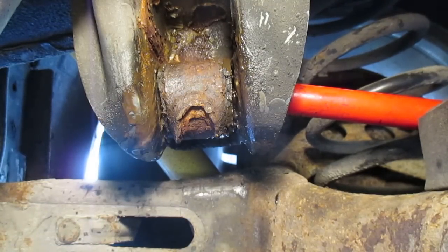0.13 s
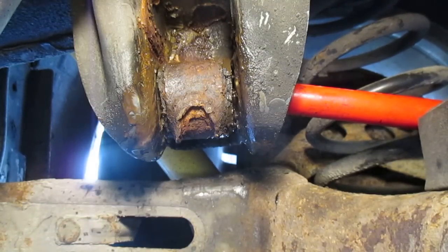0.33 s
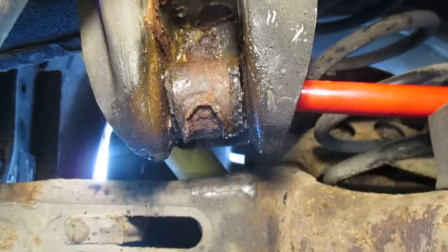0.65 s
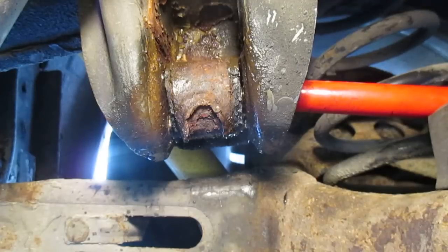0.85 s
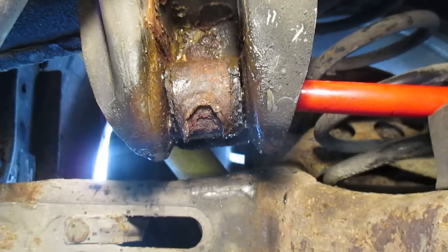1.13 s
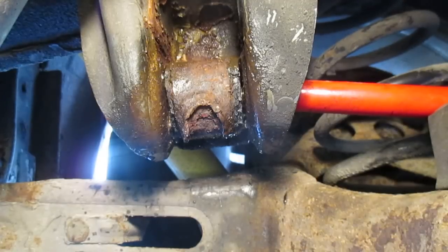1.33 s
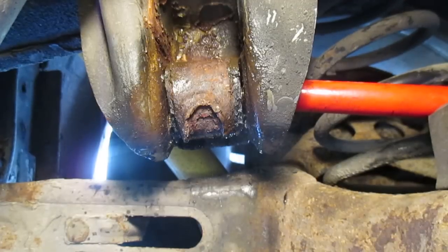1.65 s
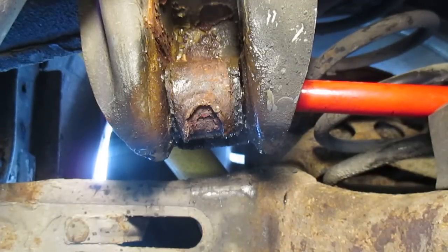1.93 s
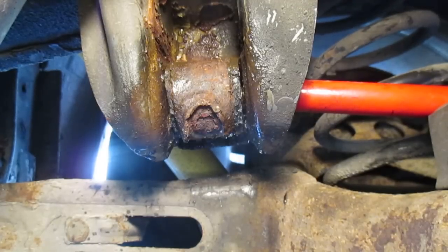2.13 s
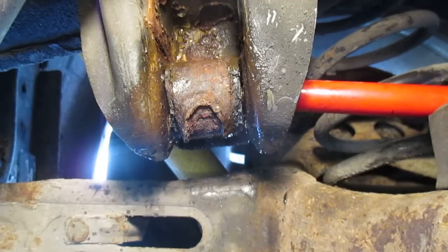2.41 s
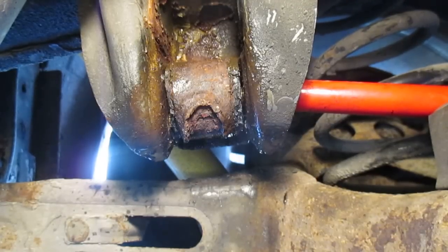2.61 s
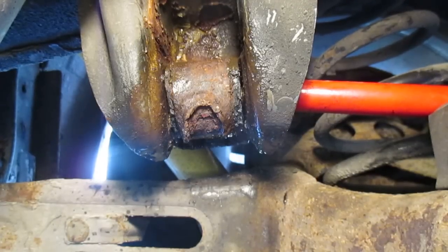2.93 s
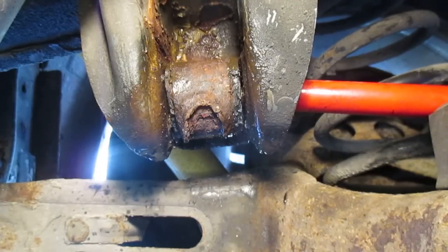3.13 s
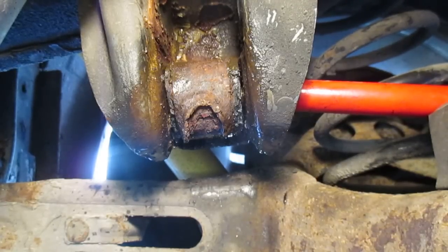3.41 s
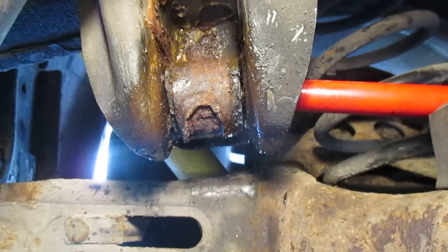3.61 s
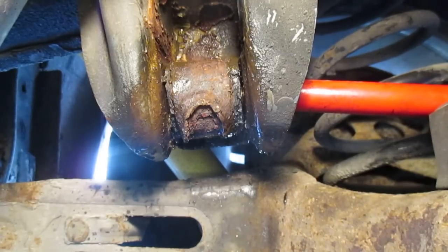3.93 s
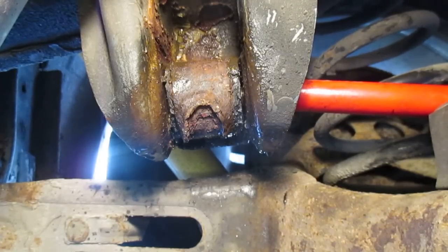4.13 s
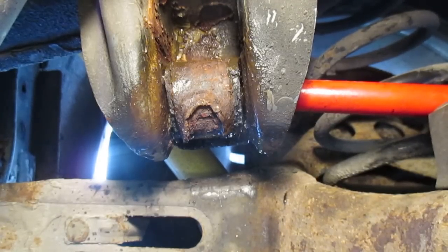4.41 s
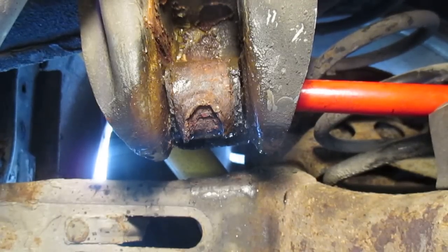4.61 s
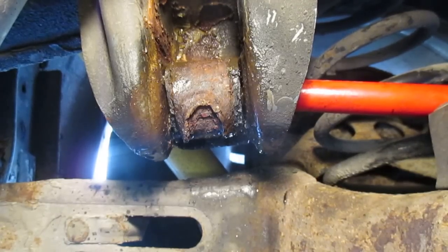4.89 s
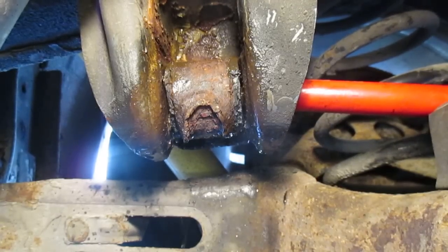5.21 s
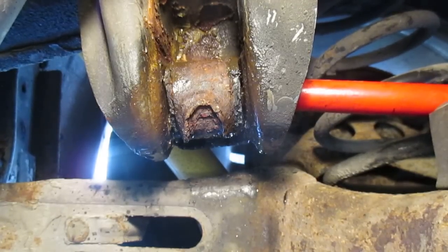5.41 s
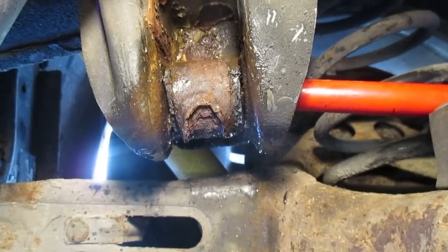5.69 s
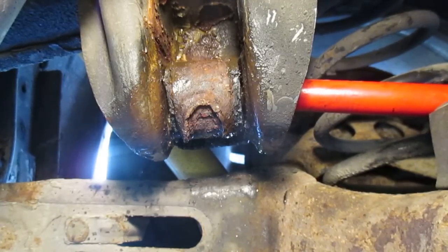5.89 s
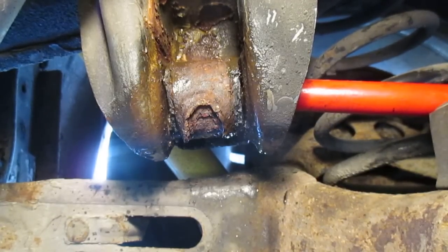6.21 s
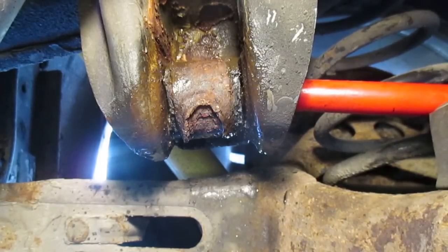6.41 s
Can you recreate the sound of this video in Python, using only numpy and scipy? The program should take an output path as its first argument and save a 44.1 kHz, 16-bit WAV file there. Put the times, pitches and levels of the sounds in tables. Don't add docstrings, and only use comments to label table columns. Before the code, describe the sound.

Eight loud, close hammer blows ring on rusty car metal about every three quarters of a second, each followed by thin ringing and dry flake ticks.

```python
import sys
import numpy as np
from scipy import signal
from scipy.fft import rfft, irfft
from scipy.io import wavfile
from scipy.ndimage import uniform_filter1d

SR = 44100
rng = np.random.default_rng(int(sys.argv[2]) if len(sys.argv) > 2 else 0)


def attenuation_scalar(level_db):
    decades = np.asarray(level_db, float) / 20
    return 10 ** decades


def generate_wav(signal):
    frames = np.transpose(np.atleast_2d(signal))
    scaled = np.clip(frames, -1, 1) * 32767
    pcm = np.round(scaled).astype(np.int16)
    wavfile.write(sys.argv[1], SR, pcm)


N = 288855

BLOW_S = [.619, 1.3634, 2.1539, 2.9032, 3.6431, 4.3948, 5.1288, 5.8402]
# (strength [dB], bass weight [dB], treble weight [dB], extra damping [dB/s], overshoot [dB])
BLOWS = [
    (2, 3, -3.5, 151.5, 7),
    (5, -1, 0.5, 46.5, 5),
    (5, -0.5, -2.5, 43.5, 3.5),
    (5, -1.5, 0.5, 47.5, 2.5),
    (5, -1.5, -0.5, 32.5, 2.5),
    (5, 2.5, 1, 38.5, 0.5),
    (5, 1, -2, 39, 2),
    (5, -1.5, 1.5, 40.5, 0.5),
]
# (frequency [Hz], rise [s])
CLANG_RISE = [(60, .02), (250, 0.002), (800, 0.0027), (2000, 0.00088), (4000, 0.00036), (16000, 0.00031)]


def evened(x):
    return x / np.sqrt(np.mean(x ** 2) + 1e-20)


def read(points, hz):
    f, value = np.transpose(points)
    return np.interp(np.log(hz + 1), np.log(f + 1), value)


def add(mix, s, sound):
    part = mix[round(s * SR):][:len(sound)]
    part += sound[:len(part)]


def resonate(x, hz, width):
    turn = np.exp(2j * np.pi * np.cumsum(hz * np.ones(len(x))) / SR)
    r = np.exp(-np.pi * width / SR)
    return 2 * (turn * signal.lfilter([1 - r], [1, -r], x / turn)).real


def resonate_twice(x, hz, width):
    return resonate(resonate(x, hz, width), hz, width)


def rings(hz, t60, rise, t):
    hz, t60, rise = hz[:, None], t60[:, None], rise[:, None]
    decay = np.exp(-np.log(1000) * t / t60)
    return np.sin(2 * np.pi * hz * t) * decay * (1 - np.exp(-t / rise))


def wobble(count, per_s, depth_db):
    span = int(SR / per_s / 2)
    slow = uniform_filter1d(uniform_filter1d(rng.standard_normal(count), span), span)
    return attenuation_scalar(depth_db * evened(slow))


def noise(spectrum, patchy_db):
    frames, hz = N // 256 + 5, np.fft.rfftfreq(1024, 1 / SR)
    a, b, patches = rng.standard_normal((frames, 513, 3)).T
    patches = uniform_filter1d(patches, size=8, axis=0)
    patches = evened(uniform_filter1d(patches, size=14, axis=1))
    z = (a + 1j * b) * attenuation_scalar(read(spectrum, hz)[:, None] + patchy_db * patches)
    return evened(signal.istft(z, nperseg=1024, noverlap=768)[1][:N])


def background():
    # (frequency [Hz], density [dB/Hz])
    hum_colour = [(12, -51), (20, -20), (55, 5), (178, -5.5), (209, -5), (329, -11.5), (447, -14),
                  (619, -19), (728, -19.5), (1500, -36.5), (1950, -63.5), (3300, -120)]
    # (frequency [Hz], density [dB/Hz])
    hiss_colour = [(590, -41), (1000, 0.5), (1210, -2), (2830, -1.5), (4600, -7), (7290, -8),
                   (13500, -17.5), (16300, -26)]
    # (frequency [Hz], width [Hz], level [dB])
    machines = [(122, 9.4, -63.5), (186, 13, -64), (249, 8.7, -64.5), (380, 9, -72.5), (734, 7, -77)]
    # (time [s], gain [dB])
    recorder_gain = [(0, 2), (.6, 1), (.64, -24), (1.35, -16.5), (2.9, -16.5), (4.3, -20), (5.1, -17),
                     (5.8, -23.5), (6.55, -24.5)]
    hum_level_db, hum_follows, hiss_level_db = -47, .7, -56
    shake_db, shake_s = 6, .3
    duck_db, duck_s = -4, .35

    t = np.arange(N) / SR
    gain_db = np.interp(t, *np.transpose(recorder_gain))
    since_blow = t - np.array([-9, *BLOW_S])[np.searchsorted(BLOW_S, t)]
    hum = noise(hum_colour, 1.2)
    for hz, width, db in machines:
        hum = hum + attenuation_scalar(db + 54.5) * evened(resonate_twice(rng.standard_normal(N), hz, width))
    hiss = noise(hiss_colour, .8)
    hum_db = hum_level_db + hum_follows * gain_db + shake_db * np.exp(-since_blow / shake_s)
    hiss_db = hiss_level_db + gain_db + duck_db * np.exp(-since_blow / duck_s)
    return attenuation_scalar(hum_db) * hum + attenuation_scalar(hiss_db) * hiss


def opening():
    # (frequency [Hz], level [dB], t60 [s])
    clank_modes = [(596, -2, 0.29), (763, -16.5, 0.73), (843, -17.5, 0.62), (1114, -15.5, 5.0),
                   (1550, -21, 0.38), (1763, -23, 0.52), (2332, -40, 5.0), (3780, -33, 0.52),
                   (3780, -25, 0.16), (5270, -33, 0.47)]
    # (time [s], level [dB], half width [s])
    hand_bumps = [
        (0.195, -28.5, 0.02),
        (0.273, -26.5, 0.012),
        (0.345, -27.5, 0.022),
    ]
    end_s, rumble_db = .62, -38.5

    t, out = np.arange(0, end_s, 1 / SR), np.zeros(N)
    hz = np.interp(t, t[[0, -1]], (44.7, 69))
    rumble = resonate(resonate(rng.standard_normal(len(t)), hz, 40), hz, 48)
    rumble = rumble / np.sqrt(uniform_filter1d(rumble ** 2, size=1200))
    level = attenuation_scalar(rumble_db)
    for s, db, half_s in hand_bumps:
        level = level + attenuation_scalar(db) * np.exp(-((t - s) / half_s) ** 2)
    tail = np.zeros(len(t))
    for mode_hz, db, t60 in clank_modes:
        rattle = evened(resonate(rng.standard_normal(len(t)), mode_hz, 21))
        tail += attenuation_scalar(db - 60 * t / min(t60, .6)) * rattle
    add(out, 0, level * rumble * signal.windows.tukey(len(t), .1) + attenuation_scalar(-25) * tail)
    return out


def stirs():
    # (time [s], level [dB], frequency [Hz], width [Hz], length [s])
    puffs = [
        (.03, -50, 1240, 150, .2),
        (0, -52, 1600, 320, .16),
        (0, -53, 2650, 2400, .2),
        (.012, -43, 602, 45, .075),
        (.167, -57, 12100, 6900, .026),
        (.256, -64, 5190, 140, .041),
        (.316, -58, 5190, 140, .036),
        (.472, -50, 740, 380, .018),
        (.552, -49, 382, 62, .048),
        (.281, -60, 8100, 4900, .058),
    ]
    out = np.zeros(N)
    for s, db, hz, width, length_s in puffs:
        puff = resonate_twice(rng.standard_normal(9000), hz, width)
        puff = puff[-round(length_s * SR):]
        add(out, s, attenuation_scalar(db) * evened(puff) * np.hanning(len(puff)))
    return out


def dust():
    per_blow, first_s, last_s, loudest_db = 3, .2, .55, -72
    when, size, pitch = rng.random((len(BLOW_S) * per_blow, 3)).T
    s = np.repeat(BLOW_S, per_blow) + first_s + (last_s - first_s) * when
    ring_db = loudest_db - 8 * size
    return list(zip(s, ring_db, ring_db + 3, 2300 + 2000 * pitch))


def flakes():
    # (time [s], ring [dB], crack [dB], pitch [Hz])
    landings = [(0.999, -64.5, -60.5, 3000), (1.6238, -80.5, -67.5, 1612), (1.6317, -65, -60, 2450),
                (1.6599, -60.5, -70, 5770), (1.7346, -74.5, -57, 3760), (1.7554, -57.5, -67, 1480),
                (1.8071, -58.5, -57.5, 3065), (2.42, -76.5, -67.5, 2370), (2.4855, -61.5, -62.5, 5880),
                (2.5522, -60, -64, 2413), (3.2134, -57.5, -76, 2984), (3.22, -55.5, -57, 3200),
                (3.2488, -49.5, -57, 3040), (3.2568, -58, -60, 3113), (3.287, -62, -62, 5800),
                (3.9312, -63, -67, 4980), (3.9775, -49.5, -52, 2840), (4.64, -54, -76, 2330),
                (4.7023, -62, -61, 5790), (4.7124, -59, -75, 4950), (4.7313, -59.5, -63, 2980),
                (4.7746, -76, -55, 2440), (5.0361, -66, -64.5, 1510), (5.4961, -72, -65, 4950),
                (5.5252, -64, -73, 2860), (3.2607, -66, -53, 5000), (6.1675, -65, -65.5, 5770),
                (6.1879, -62, -69, 2330), (6.2174, -54, -78, 1000), (6.2595, -61, -58, 5100)]
    t, out = np.arange(1200) / SR, np.zeros(N)
    shape = np.exp(-t / .0033) * (1 - np.exp(-t / .0004))
    for s, ring_db, crack_db, hz in [*landings, *dust()]:
        a, b = rng.standard_normal((len(t), 2)).T
        ring = evened(resonate(a, hz, 580)) + 0.25 * evened(resonate_twice(a, 3500, 5000))
        crack = evened(resonate_twice(b, 7900, 7600))
        add(out, s, (attenuation_scalar(ring_db - 2) * ring + attenuation_scalar(crack_db + 1) * crack) * shape)
    return out


def head_top():
    pair_hz = [11725, 11677]
    # (upper [dB], lower [dB], fade [dB/s])
    pair_levels = [
        (-70, -41, 259.5),
        (-39, -46, 308),
        (-42, -58, 290.5),
        (-44.5, -55, 302),
        (-37.5, -53, 234.5),
        (-34.5, -48, 332),
        (-45.5, -60.5, 331),
        (-36, -63, 263.5),
    ]
    t, out = np.arange(SR // 3) / SR, np.zeros(N)
    pair = np.sin(2 * np.pi * np.outer(pair_hz, t)) * np.minimum(t / .012, 1)
    for s, (upper_db, lower_db, fade_db) in zip(BLOW_S, pair_levels):
        weight = np.sqrt(2) * attenuation_scalar([upper_db, lower_db])
        add(out, s, weight @ pair * attenuation_scalar(-fade_db * t))
    return out


def head():
    # (start [s], lift [s], level at the lift [dB], fade before it [dB/s], echo share [0-1])
    head_rings = [
        (.66, 0.818, -68, 12.5, .5),
        (1.383, 1.573, -51.5, 3.5, .4),
        (2.173, 2.339, -57, 42, .7),
        (2.929, 3.083, -51.5, 42, .35),
        (3.669, 3.825, -47, 16.5, .5),
        (4.45, 4.575, -72.5, 92.5, 0.58),
        (5.193, 5.302, -66, 77, .5),
        (5.859, 5.995, -43.5, 41, .5),
    ]
    head_hz, echo_growth = 6402, 2
    beats_per_s, beat_growth = 7.9, 56
    lifted_db_per_s = 156
    after_db, after_db_per_s = -21.5, 56

    out = np.zeros(N)
    for start, lift, db, fade_db, share in head_rings:
        t = np.arange(start - lift, .5, 1 / SR)
        moving = np.maximum(t, 0)
        cycles = beats_per_s * t + beat_growth * moving ** 2
        echo = np.clip(share + echo_growth * share * moving, 0, .9) * np.exp(2j * np.pi * cycles)
        level = attenuation_scalar(db - fade_db * np.minimum(t, 0)) * abs(1 + echo) / (1 + share)
        level = level * (attenuation_scalar(-lifted_db_per_s * moving) + attenuation_scalar(after_db - after_db_per_s * moving))
        soft = np.minimum((t - t[0]) / .015, 1) * wobble(len(t), 30, 1.5)
        add(out, start, np.sqrt(2) * level * soft * np.sin(2 * np.pi * head_hz * t))
    return out


def lasting():
    # (frequency [Hz], level [dB], t60 [s])
    ringing_parts = [
        [(420, 0, .3)],
        [(720, 0, .3), (775, 0, .3), (870, -3, .25)],
        [(1023, 0, .4), (1140, -12, .8), (1680, -15, .43), (1703, -12, .43)],
        [(2351, 0, .4), (2323, -9, .3)],
        [(4049, 0, .45), (4074, -5, .45)],
        [(4180, 0, .13)],
    ]
    # (pan [dB], rail [dB], bracket [dB], hammer head [dB], bolt
    # [dB])
    parts_left = [(-62, -77, -78, -69, -87), (-63, -67.5, -76, -76, -88.5), (-66.5, -68, -66.5, -64, -81),
                  (-56.5, -67, -67.5, -72, -76.5), (-66, -71.5, -76.5, -77, -92.5),
                  (-56, -59.5, -64, -72.5, -83), (-55, -61.5, -58.5, -88.5, -92.5),
                  (-68, -71.5, -77, -86, -79)]
    plate_left = [-114, -95.5, -112, -104, -112, -110, -112, -101]
    left_s = .16

    t, out = np.arange(SR // 2 + 8000) / SR, np.zeros(N)
    for modes, levels_db in zip(ringing_parts, [*np.transpose(parts_left), plate_left]):
        hz, db, t60 = np.transpose(modes)
        tones = rings(hz, t60, np.full(len(hz), .007), t)
        for s, left_db in zip(BLOW_S, levels_db):
            uneven = [wobble(len(t), 12, 2) for _ in hz]
            start_db = left_db + db + 60 * left_s / t60
            add(out, s, np.sqrt(2) * attenuation_scalar(start_db) @ (tones * uneven))
    return out


def clang(t, colour):
    # (frequency [Hz], density [dB/Hz])
    clang_colour = [(29, -39), (60, -12.5), (110, -11), (160, -17.5), (240, -10), (310, -16), (520, -6),
                    (640, -8), (850, 0.5), (1400, -8.5), (2500, -7), (5000, -13.5), (11700, -23.5),
                    (16000, -45)]
    # (frequency [Hz], t60 [s])
    clang_decay = [(60, .25), (250, 0.21), (800, 0.067), (2000, 0.063), (4000, 0.043), (8000, 0.042),
                   (16000, 0.02)]
    # (frequency [Hz], level [dB])
    scattered = [(300, -23.5), (2000, -23.5), (6000, -20), (14000, -14.5)]
    tail_stretch, lumpy_db = 2.5, 3

    hz, centres = np.fft.rfftfreq(len(t), 1 / SR), np.geomspace(50, 16000, num=18)
    place = np.interp(np.log(hz + 1), np.log(centres), np.arange(len(centres)))
    distance = place - np.arange(len(centres))[:, None]
    bands = np.cos(np.pi / 2 * np.clip(distance, -1, 1)) ** 2
    z = rfft(rng.standard_normal(len(t))) * attenuation_scalar(read(clang_colour, hz)) * wobble(len(hz), 1500, lumpy_db)
    z = z / np.linalg.norm(z) * len(t) / 2 * attenuation_scalar(read(colour, hz))
    t60, rise = read(clang_decay, centres)[:, None], read(CLANG_RISE, centres)[:, None]
    snap = 1 + 0.8 * np.exp(-t / (.05 * t60))
    direct = snap * attenuation_scalar(-60 * t / t60)
    tail = attenuation_scalar(read(scattered, centres)[:, None] - 60 * t / t60 / tail_stretch)
    shape = (direct + tail) * (1 - np.exp(-t / rise))
    return (irfft(bands * z, len(t)) * shape).sum(axis=0)


def hammer():
    # (frequency [Hz], level [dB], t60 [s])
    strong_modes = [(79, -15.5, 0.17), (253.4, -7, 0.082), (572, -0.5, 0.046), (828.5, -10, 0.16),
                    (1026, -3, 0.061), (1226, -8, 0.082), (1556, -13, 0.088), (1660, -12.5, 0.023),
                    (2214, -2, 0.065), (2900, 7, .012)]
    # (time [s], strength [dB], bass weight [dB], treble weight [dB], extra damping [dB/s])
    rebounds = [
        (0.6892, -27.5, 10, -16, 250),
        (2.9797, -15, 9.5, -8.5, 256),
        (4.4503, -29, -0.5, 2.5, 200),
        (5.161, -29.5, -8.5, -0.5, 152),
        (5.1712, -23, -1, -4, 224),
        (5.1901, -18, 4, -14, 200),
    ]
    frame_db, spread_db = -7.5, 2

    t, out = np.arange(2 ** 14) / SR, np.zeros(N)
    hz, single_db, t60 = np.transpose(strong_modes)
    modes = rings(hz, t60, read(CLANG_RISE, hz), t)
    blows = [(s, *row[:4]) for s, row in zip(BLOW_S, BLOWS)]
    for s, db, bass_db, treble_db, damping_db in [*blows, *rebounds]:
        sign, chance = rng.standard_normal((len(hz), 2)).T
        colour = [(300, bass_db), (1200, 0.00056), (2500, 0.0078), (7000, treble_db)]
        weight = np.sign(sign) * attenuation_scalar(frame_db + single_db + read(colour, hz) + spread_db * chance)
        add(out, s, attenuation_scalar(db - damping_db * t) * (weight @ modes + clang(t, colour)))
    return out


def shop(x):
    # (frequency [Hz], t60 [s])
    room_decay = [(100, 0.46), (400, 0.34), (1500, .45), (3500, .3), (7000, .2), (14000, 0.14)]
    taps = np.zeros(SR)
    at = np.arange(200, SR - 20, 20) + rng.integers(0, 20, size=(SR - 201) // 20)
    taps[at] = rng.choice([-1., 1.], at.shape)
    hz, t, z = signal.stft(taps, SR, nperseg=256)
    z = z * attenuation_scalar(-60 * t / read(room_decay, hz)[:, None])
    tail = signal.istft(z, SR, nperseg=256)[1]
    return signal.fftconvolve(x, tail / np.linalg.norm(tail))[:N]


def scene():
    blows, ticks = hammer(), flakes()
    metal = blows + lasting() + head() + head_top()
    dulled = resonate(blows, 1500, 3300)
    echo = shop(attenuation_scalar(-44) * dulled + attenuation_scalar(-16.5) * ticks)
    return (metal + ticks + echo + opening() + stirs() + background())[None]


def low_pass(x):
    return signal.sosfilt(signal.butter(12, 16480, fs=SR, output="sos"), x)


def record(dry):
    rounded = .66 * np.tanh(dry / .66)
    t, late_db = np.arange(2000) / SR, np.zeros(N)
    for s, (*_, overshoot_db) in zip(BLOW_S, BLOWS):
        hold_s = .00042 * overshoot_db
        add(late_db, s, overshoot_db * np.exp(-(t / hold_s) ** 2))
    full = np.clip(rounded * attenuation_scalar(late_db), -1, 1)
    top_edge = signal.firwin(255, 16000, fs=SR)[None]
    smooth = signal.oaconvolve(full, top_edge, "same")
    return low_pass(np.clip(smooth, -1, 1))


dry = scene()
out = record(dry)
generate_wav(out)
```